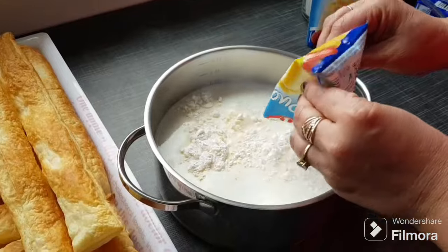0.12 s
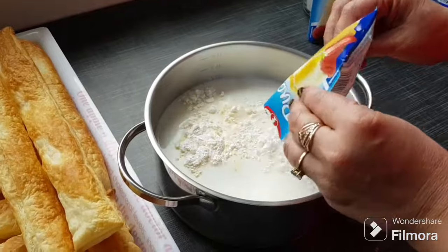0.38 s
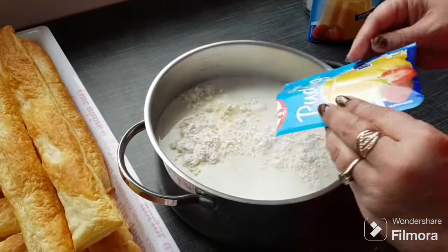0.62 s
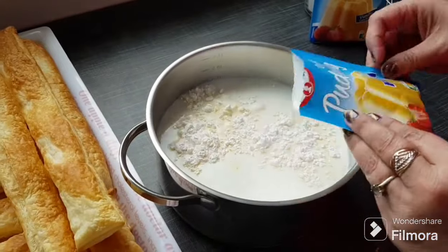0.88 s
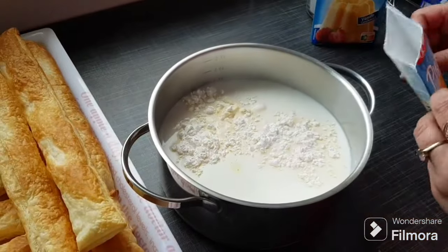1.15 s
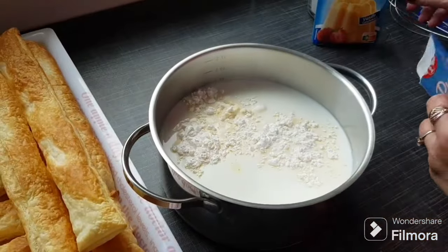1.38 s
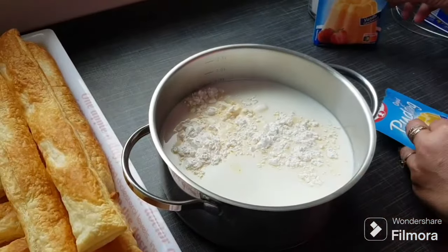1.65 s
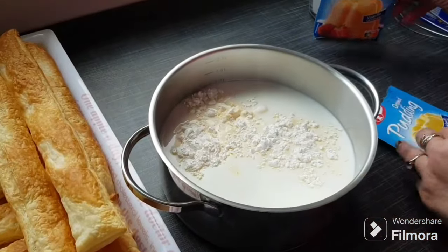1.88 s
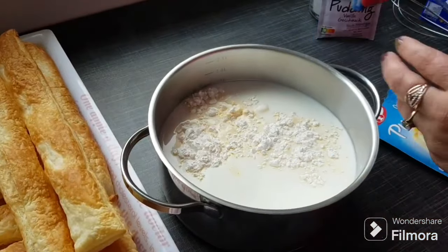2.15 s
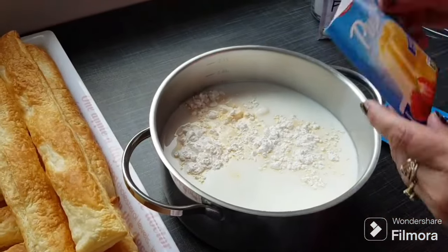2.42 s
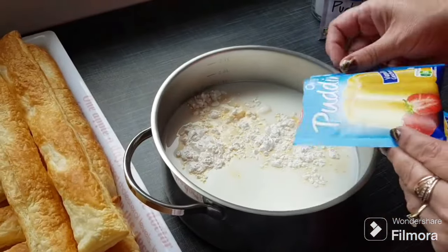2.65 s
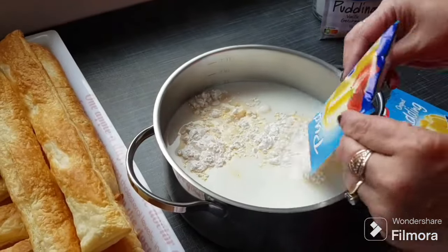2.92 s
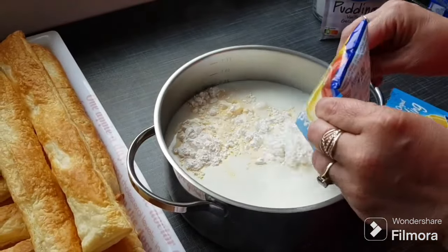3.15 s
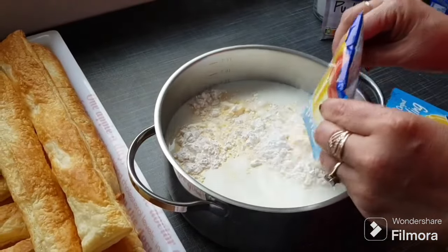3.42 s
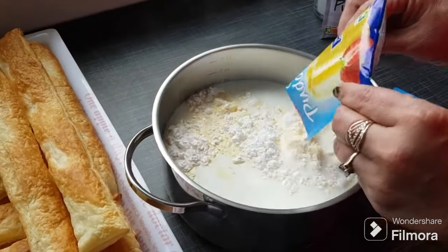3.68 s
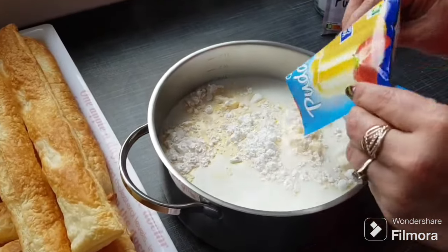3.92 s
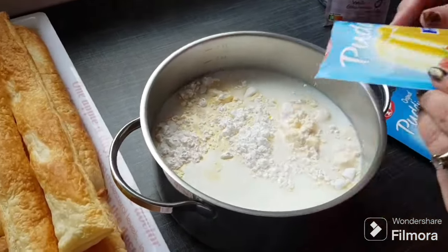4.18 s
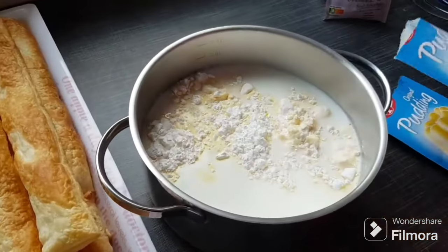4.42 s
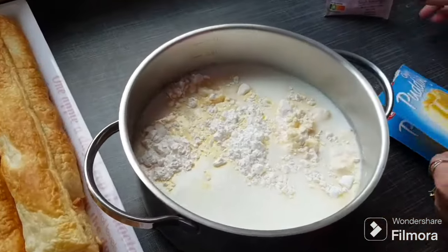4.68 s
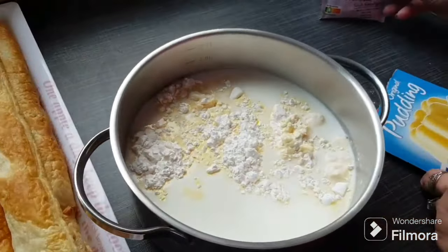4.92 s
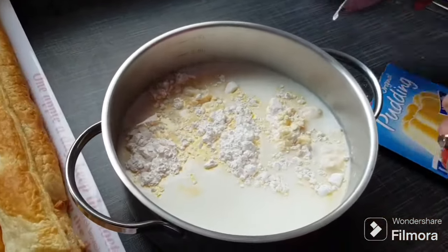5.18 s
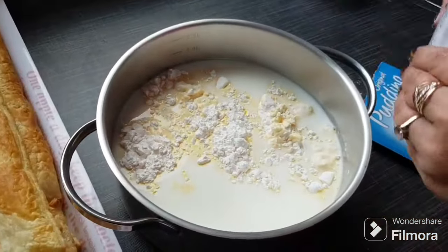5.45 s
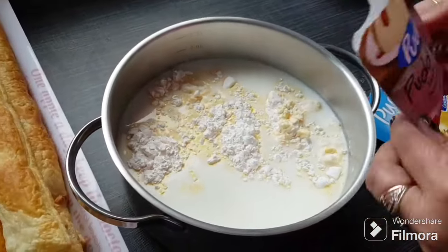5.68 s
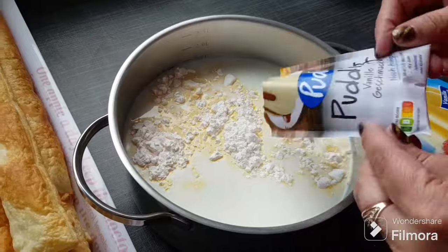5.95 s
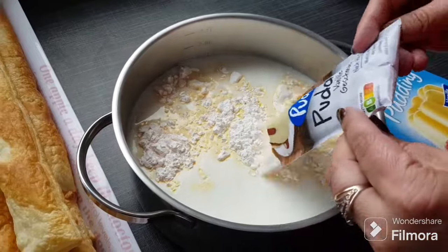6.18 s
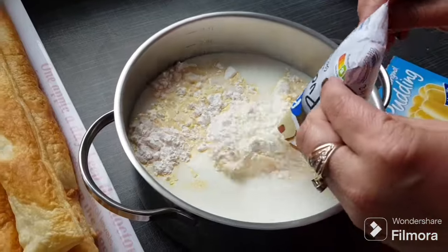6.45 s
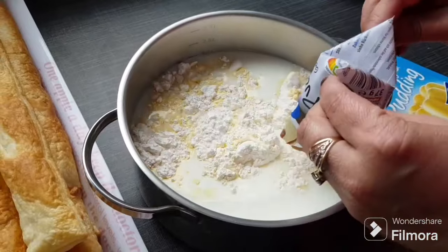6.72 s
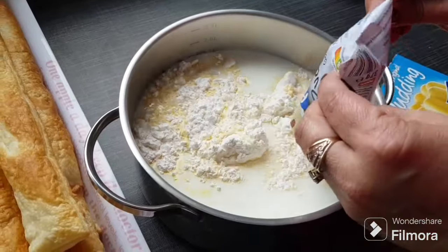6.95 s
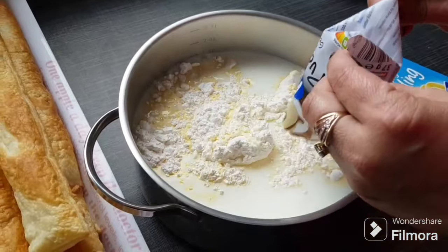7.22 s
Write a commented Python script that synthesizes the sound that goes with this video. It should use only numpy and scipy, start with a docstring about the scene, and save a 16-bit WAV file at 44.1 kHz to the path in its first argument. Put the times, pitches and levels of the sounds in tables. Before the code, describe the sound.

Paper packets crinkle near the microphones as powder is shaken into a pot. Bright irregular crackles with short room echoes open strongly, fade to near quiet, flare again just past three seconds, dwindle, then become dense and loud around six and a half. Low wavering appliance noise lies far behind, with a deep hum appearing at the very end.

```python
"""Paper sachets over a pot

Small hard-walled kitchen, a phone close by with two microphones: a hand squeezes and shakes stiff sachets.
Creases snap as short noise bursts ringing two paper panels; each snap gets its own fading room echo.
Under them lie a rustle of clumped clicks and soft finger pats made of damped sines.
Far behind, an appliance drones as shaped noise with moving air, microphone hiss and a late deep hum."""
import sys
import numpy as np
from scipy import signal
from scipy.fft import rfft, irfft, next_fast_len
from scipy.io import wavfile
from scipy.ndimage import uniform_filter1d, map_coordinates

SR = 44100
rng = np.random.default_rng(int(sys.argv[2]) if len(sys.argv) > 2 else 0)


def rack_gain(trim_db):
    """Turn a fader trim in dB into the linear factor to multiply a signal by."""
    fader = np.asarray(trim_db, float)
    return 10 ** (fader / 20)


def put_to_file(sound):
    """Save the sound as 16-bit audio at rate SR, in the file named by the first command-line argument."""
    columns = np.atleast_2d(sound).T  # one column per channel
    safe = np.clip(columns, -1, 1)
    whole_steps = np.round(safe * 32767)
    wavfile.write(sys.argv[1], SR, whole_steps.astype(np.int16))


N = 323385  # samples
TIME_S = np.arange(N) / SR


def unit(x):
    """Scaled to rms 1 along time."""
    return x / np.sqrt(np.mean(x ** 2, axis=-1, keepdims=True) + 1e-20)


def along(points, hz):
    """Values at hz from (Hz, value) points joined on a log axis."""
    f, value = np.transpose(points)
    return np.interp(np.log(hz + 1), np.log(f + 1), value)


def wobble(rate):
    """A smooth random curve with rate knots a second."""
    knots = rng.standard_normal(int(N * rate / SR) + 4)
    return map_coordinates(knots, [np.arange(N) * rate / SR])


def filtered(x, response):
    """x shaped by a complex response of frequency."""
    size = next_fast_len(x.shape[-1] + 8192)
    spectrum = rfft(x, size) * response(np.fft.rfftfreq(size, 1 / SR))
    return irfft(spectrum, size)[..., :x.shape[-1]]


def causal(db):
    """Minimum-phase response: the given gains with the energy as early as possible."""
    cepstrum = irfft(np.log(rack_gain(db) + 1e-6))
    half = cepstrum.shape[-1] // 2
    cepstrum[..., 1:half] *= 2
    cepstrum[..., half + 1:] = 0
    return np.exp(rfft(cepstrum))


# colour of the stiff paper, shared by snaps and rustle: f/Hz, relative level/dB
PAPER_COLOUR = [(150, -16), (260, -8.5), (450, -4), (900, 0), (2000, 1.5), (3200, 0.5), (5000, -3.5),
                (9000, -10.5), (14300, -14.5), (17000, -16)]
# creases buckling: t/s, nominal peak level/dB, small panel ring f/Hz, body level/dB, treble level/dB
CREASES = [(0.034, -8, 1650, -2.5, 2), (0.148, -14.5, 1650, -15, 8), (0.171, -10.5, 1700, 0.5, 5.5),
           (0.227, -17, 2060, 17, 17), (0.235, -3.5, 3520, 5, 8), (0.466, -11, 3320, -8.5, 11),
           (0.616, -15.5, 1690, 0, -16), (0.658, -14.5, 2120, -28, -7.5), (0.679, -27.5, 1510, 26.5, 2),
           (0.759, -12.0, 3700, -7, -12), (0.789, -20.5, 1820, -8, -7), (0.81, -22.5, 1750, 2, -24),
           (0.852, -20, 1810, -22, -5.5), (0.861, -21.5, 3600, -20, 5.5), (0.883, -18.5, 2170, -5, -15),
           (1.003, -29.5, 1410, -24, -5), (1.05, -16.0, 2170, -5.5, -12.5), (1.118, -28.5, 1770, 10, 2),
           (1.228, -3.5, 1770, -16, 1), (1.311, -19, 1630, -5.5, -8.5), (1.342, -20, 2640, 3.5, -4.5),
           (1.444, -25, 1880, 1.0, -20.5), (1.619, -25, 1390, 6.5, -2), (1.691, -29, 1730, 10.5, -10.5),
           (1.728, -26.5, 1770, -11, -19), (1.761, -31, 1800, 5, 6.5), (1.845, -18, 3100, -5.5, -13),
           (1.929, -28.5, 3050, 3, -4.5), (2.476, -43, 1740, 11, -9.5), (2.638, -45.5, 1630, -1, 0),
           (2.7, -20.5, 2150, -5, 6.5), (2.757, -21.5, 2130, -6.5, -9), (2.79, -30.5, 1620, -4, -9),
           (2.817, -23, 2200, 1, -4.5), (2.857, -28, 1560, 12, -5), (2.875, -30.5, 2620, 9, -5),
           (2.985, -31, 2100, 3, -9.0), (3.096, -35, 1390, 8, -15), (3.146, -38, 1370, -8, -12),
           (3.198, -35.5, 1760, 9.5, -26), (3.24, -26.0, 1610, 2.5, -51), (3.303, -11.5, 3440, 8, 17),
           (3.327, -8.0, 1520, -1, -15), (3.554, -19.5, 1650, 8, -41), (3.574, -25.5, 1450, 13, -31),
           (3.668, -19.0, 3500, -11.5, -6), (3.809, -36.5, 1520, -7, -7), (4.061, -39.5, 1650, -8, -17),
           (4.118, -38.0, 1570, 20, -9), (4.142, -18.5, 1550, -11, -7), (4.208, -21.5, 1650, -18, -16),
           (4.221, -19.5, 3080, -14, 0.5), (4.396, -40, 1490, -2, 1.5), (4.462, -39, 1510, 0, -31),
           (4.521, -29.5, 1530, -1, -28), (4.532, -32.0, 1510, -2, -34), (4.566, -27.5, 1490, -2, -37),
           (4.574, -31, 1550, -10.0, -33), (4.612, -30, 1640, 2, -24), (4.63, -23, 2260, -1, -3.5),
           (4.646, -20.5, 1670, 7.5, -11), (4.682, -21, 3600, 0, -0.5), (4.846, -37, 3000, -22, 5),
           (5.111, -24.5, 1380, -1.0, 13.5), (5.13, -32.5, 2010, 12, -1.5), (5.658, -18.5, 3100, -25, 17),
           (5.847, -36, 3850, -20, 19), (5.919, -29, 1950, -0.5, -13), (5.965, -27.5, 1900, -8, -12),
           (6.016, -21, 1600, 0, 10), (6.023, -16, 1870, -10, -17), (6.042, -11, 1650, -9, 2.5),
           (6.05, -12.5, 1710, -8, -3), (6.073, -25, 2600, -14.5, -15), (6.138, -16, 1650, 4.5, 0),
           (6.216, -24, 2380, -11, 17), (6.298, -28, 1530, -5, -3), (6.384, -18.5, 4000, -6.0, -18),
           (6.406, -12.5, 3620, -5.5, 3.5), (6.45, -7, 2720, 1.5, 2.5), (6.512, -11.5, 1650, 2.5, -4.5),
           (6.563, -2.5, 2700, -4.5, 8), (6.624, -10, 1730, -4.5, -7), (6.628, -23, 1880, 7, 9),
           (6.657, 0.5, 2900, 1.5, 2.5), (6.804, -27, 1370, 16, -18), (6.812, -25.0, 1420, 15.5, -20.0),
           (6.821, -18.5, 1580, 13, -37), (6.836, -21, 2040, 1, -21), (6.868, -16, 2970, 2.5, -9),
           (6.882, -25.5, 2400, 1, -10.5), (6.999, -30, 1590, -21, -18), (7.014, -28.5, 1600, -1, -20),
           (7.033, -24, 1350, 7, -14), (7.193, -33, 1430, 11.5, -6), (7.229, -24.5, 1360, 6, -27),
           (7.294, -29, 1370, 16, -30)]
# ring of the large panel as the grip changes: t/s, f/Hz
LARGE_PANEL = [(0, 800), (1.0, 895), (1.2, 1090), (1.35, 870), (1.6, 650), (2.7, 1233), (2.85, 630),
               (3.1, 1070), (3.3, 847), (4.2, 930), (4.6, 700), (4.65, 905), (6.0, 970), (6.7, 860),
               (6.8, 670), (6.82, 872), (6.87, 558), (7.33, 467)]


def snaps(room_db, ring_db, size=16384):
    """Each crease gives way in a few ms and rings two panels, the more the duller; the room carries it on."""
    s, peak_db, small_hz, body_db, treble_db = np.transpose(CREASES)[..., None]
    large_hz = np.interp(s, *np.transpose(LARGE_PANEL))
    t, hz = np.arange(512) / SR, np.fft.rfftfreq(size, 1 / SR)
    burst_shape = rack_gain(-60 * t / 0.0062) * (1 - np.exp(-t / 0.00025))
    slips = rfft(rng.standard_normal((len(s), 512)) * burst_shape, size)
    slips /= np.abs(slips) ** .7 + 1e-9  # sharp slips excite all frequencies about evenly
    slips /= np.sqrt(np.mean(np.abs(slips) ** 2, axis=1, keepdims=True))

    body = 1 / (1 + (hz / 1200) ** 4)
    treble = 1 / (1 + (5000 / (hz + 1)) ** 3)
    broad_db = along(PAPER_COLOUR, hz) + body * body_db + treble * treble_db
    large_share = 1.07 / (1 + rack_gain(-body_db - 9))  # full-bodied snaps move the large panel
    small_share = 1.09 / (1 + rack_gain(body_db - 17.5))
    large_ring = large_share * np.exp(-(np.log((hz + 1) / large_hz) / 0.12) ** 2)
    small_ring = small_share * np.exp(-(np.log((hz + 1) / small_hz) / 0.12) ** 2)
    ring = (ring_db - 0.31 * treble_db) * (large_ring + small_ring)
    colour = causal(broad_db + ring)
    blended = causal(broad_db + 0.39 * ring)  # the room mixes all directions, so the rings blur
    strength = np.linalg.norm(colour, axis=1, keepdims=True)
    blended *= strength / np.linalg.norm(blended, axis=1, keepdims=True)
    gain = rack_gain(peak_db) * np.sqrt(size) / strength * rack_gain(7.5)  # the peak spreads over a few ms

    # each crease lies in its own direction
    lag_s = .00008 + .00005 * rng.standard_normal((len(s), 1))
    pan_db = 3 * rng.standard_normal((len(s), 1))
    near = np.moveaxis(ports(hz, lag_s) * (slips * colour), 0, 1)
    near = near * rack_gain(pan_db[:, None] * [[.5], [-.5]])
    far = rack_gain(room_db) * blended[:, None] * rfft(echoes(count=len(s), early_db=1.0))
    lead = 256  # samples of room for sound ahead of the nominal start
    heard = np.roll(irfft((near + far) * gain[:, None], size), lead, axis=-1)
    out = np.zeros((2, N + size))
    for start, sound in zip(np.round(s[:, 0] * SR).astype(int) - lead, heard):
        out[:, start:start + size] += sound
    return out[:, :N]


# fingers sliding on the paper: t/s, length/s, rustle level/dB, treble and body level/dB relative to it
FINGER_STROKES = [(0.031, .01, -48.5, -6, 3), (0.149, .03, -48, 0.5, 1), (0.272, 0.061, -50, -9, 1.5),
                  (0.624, .01, -55, -13, 7), (0.696, .14, -57, -6, -11), (0.856, 0.05, -56.5, -1, 1.5),
                  (0.982, 0.049, -53, -2.5, -1.5), (1.224, .01, -55.5, -14, 8.5),
                  (1.244, 0.08, -42.5, -11, -6), (1.628, 0.19, -57.5, -10, -2.5),
                  (1.732, 0.016, -66, 3, 14), (1.977, 0.061, -57.5, -5, -10), (2.663, 0.037, -65, 5, -4),
                  (2.987, 0.06, -54, -2, -4.5), (3.066, .14, -71, 1, 12), (3.807, 0.084, -66.5, -10, 5),
                  (3.992, 0.1, -59.5, -6, -7), (4.171, 0.047, -60.5, 10, 12.5),
                  (4.367, 0.48, -72, 0.5, 10.5), (4.688, 0.021, -46.5, 1, -7),
                  (4.825, 0.12, -60, -2.5, -38), (5.005, 0.017, -48.5, -6.5, -10.5),
                  (5.14, 0.0099, -61, -4, 6), (5.614, 0.057, -74, 17, -1.5),
                  (5.704, 0.064, -62.5, 6.5, -17), (5.875, 0.034, -53, 8, -9),
                  (6.069, 0.077, -55, 11.5, 4.5), (6.117, 0.0081, -55, 4, 5), (6.326, 0.063, -57, 2.5, 1),
                  (6.677, 0.032, -54.5, -2, 0), (6.799, 0.066, -56, -9, 10.5),
                  (6.999, 0.035, -53.5, -3.5, -1), (7.195, 0.11, -73, 5.5, 19.5)]
# crackling on after a snap, rows middle, treble, body: level/dB relative to the snap, 60 dB decay/s
CREASE_SETTLING = [(-37, .3), (-39, .33), (-38.5, 0.1)]


def effort():
    """Rustle strength in middle, treble and body: powers of finger strokes and of settling creases add."""
    rise_s, fall_s = 0.15, 0.28  # time to climb and to drop 60 dB
    t = np.arange(0, N / SR + .002, .001)
    start, length, level_db, treble_db, body_db = np.transpose(FINGER_STROKES)[..., None]
    before, after = np.maximum(start - t, 0), np.maximum(t - start - length, 0)
    shape_db = level_db - 60 * (before / rise_s + after / fall_s)
    s, peak_db, _, snap_body_db, snap_treble_db = np.transpose(CREASES)[..., None]
    since = np.maximum(t - s, 0)
    stroke_colours = (0, treble_db, body_db)
    snap_colours = (0, snap_treble_db, snap_body_db)
    bands = []
    for stroke_db, snap_db, (under_db, t60) in zip(stroke_colours, snap_colours, CREASE_SETTLING):
        settling = (t >= s) * rack_gain(peak_db + snap_db + under_db - 60 * since / t60)
        power = np.sum(rack_gain(shape_db + stroke_db) ** 2, axis=0) + np.sum(settling ** 2, axis=0)
        bands.append(np.interp(TIME_S, t, np.sqrt(power)))
    return bands


def crackle(rate, spread_db):
    """Tiny random clicks in clumps, a few much larger than the rest."""
    chance, sign = rng.random(N), rng.standard_normal(N)
    size = np.minimum(rng.exponential(size=N), 2.5)
    clicks = chance < rate * rack_gain(2.5 * wobble(30)) / SR
    return unit(clicks * sign * rack_gain(spread_db * size))


def rustle(room_db, pieces=24):
    """Dense paper crackles heard mostly by way of the room, a fresh random echo for each equal piece."""
    middle, treble, body = effort()
    clicks = crackle(rate=1400, spread_db=4.0)

    def band(low_hz, high_hz):
        """Paper-coloured clicks between two soft edges, rms 1."""
        def response(hz):
            edges = (1 + (low_hz / (hz + 1)) ** 4) * (1 + (hz / high_hz) ** 4)
            return rack_gain(along(PAPER_COLOUR, hz)) / edges
        return unit(filtered(clicks, response))

    direct = middle * band(1700, 6000) + treble * band(5800, 18000) + body * band(190, 1200)
    # an extra fade shortens the room for the rustle
    rooms = echoes(count=pieces, early_db=0.5) * rack_gain(-60 * np.arange(16384) / SR / 0.25)
    wet, step = np.zeros((2, N + SR)), N // pieces + 1
    for start, room in zip(range(0, N, step), rooms):
        room = room / np.linalg.norm(room[0])
        answer = signal.fftconvolve(direct[None, start:start + step], room, axes=1)
        wet[:, start:start + answer.shape[1]] += answer
    near = filtered(direct, lambda hz: ports(hz, lag_s=.0001))
    return (near + rack_gain(room_db) * wet[:, :N]) / np.sqrt(1 + rack_gain(2 * room_db))


# fingertips patting the soft belly of the sachet: t/s, level/dB before onset and decay, f/Hz
FINGER_PATS = [(0.236, -24.5, 260), (0.68, -38.5, 450), (1.62, -31, 247), (3.304, -28, 298),
               (4.225, -45.5, 200), (6.66, -33.5, 400), (6.805, -25, 620), (6.822, -45, 855),
               (6.87, -25, 565), (7.036, -29.5, 450), (7.229, -27, 277), (7.293, -25.5, 403)]


def pats():
    """Each pat is one soft, quickly damped swing of the filled bag."""
    decay_cycles = 8.1  # to fall 60 dB
    out, t = np.zeros(N + 2048), np.arange(2048) / SR
    for s, level_db, hz in FINGER_PATS:
        swing = np.sin(2 * np.pi * hz * t) * (1 - np.exp(-t * hz / 0.25))
        out[round(s * SR):][:len(t)] += rack_gain(level_db - 60 * t * hz / decay_cycles) * swing
    return out[:N]


def ports(hz, lag_s):
    """Phases at the left and right microphone; with a positive lag the right one hears first."""
    return np.exp(np.multiply.outer([-1j, 1j], np.pi * hz * lag_s))


# dying away of the kitchen's late echoes: f/Hz, 60 dB decay/s
KITCHEN_DECAY = [(300, 0.47), (800, 0.48), (2000, 0.41), (5500, 0.26), (14000, 0.097)]
# likeness of the echoes at the left and right microphone: f/Hz, correlation/1
ECHO_LIKENESS = [(300, 1), (700, 0.27), (1500, 0.25), (8000, 0.03)]


def echoes(count, early_db, size=16384):
    """Fresh stereo room answers of energy 1: each frequency dies at its own speed, near surfaces add early."""
    hz, t, z = signal.stft(rng.standard_normal((count, 2, size)), SR, nperseg=256)
    turn = np.arccos(np.clip(along(ECHO_LIKENESS, hz), -1, 1))[:, None] / 2
    mid, side = z[:, 0] * np.cos(turn), z[:, 1] * np.sin(turn)
    decay = rack_gain(-60 * t / along(KITCHEN_DECAY, hz)[:, None])
    fading = np.stack([mid + side, mid - side], axis=1) * decay
    tail = signal.istft(fading, SR, nperseg=256)[1][..., :size]
    t = np.arange(size) / SR
    tail = tail * (1 - np.exp(-t / 0.001)) * (1 + rack_gain(early_db - 60 * t / 0.09))
    return unit(tail) / np.sqrt(size)


def rush(spectrum, alike):
    """Stereo noise of rms 1, partly shared by both microphones."""
    def mid_side(hz):
        turn = np.arccos(np.clip(along(alike, hz), -1, 1)) / 2
        return rack_gain(along(spectrum, hz)) * [np.cos(turn), np.sin(turn)]
    mid, side = filtered(rng.standard_normal((2, N)), mid_side)
    return unit(np.array([mid + side, mid - side]))


# colour of the appliance drone: f/Hz, relative level/dB per Hz
DRONE_COLOUR = [(18, -42), (30, -21.5), (54, -24.5), (80, -25), (93, -19), (113, -7), (126, -3), (145, 2.5),
                (184, -9.5), (200, -14.5), (232, -20), (273, -3.5), (308, -11), (330, -16), (430, -45.5),
                (730, -120)]
# swell and sinking of the drone, under a small random waver: t/s, level/dB
DRONE_SWELL = [(0.1, -57.5), (1.74, -55.5), (2.1, -58.5), (2.4, -61.5), (2.71, -55), (3.07, -59.5),
               (3.53, -52.5), (3.95, -60), (4.17, -53), (5.45, -59), (5.64, -55), (7.3, -57.5)]
# colour of the moving air: f/Hz, relative level/dB per Hz
AIR_COLOUR = [(250, -3), (330, -5), (450, -7), (560, -7), (750, -20), (1000, -51.5), (1500, -75)]
# colour of the microphone hiss: f/Hz, relative level/dB per Hz
HISS_COLOUR = [(530, -27), (900, -4), (4630, -3.5), (6800, -8.5), (14000, 0), (14700, -25), (15200, -29.5),
               (16000, -24)]
# likeness of drone and air at the left and right microphone: f/Hz, correlation/1
LOW_LIKENESS = [(40, 0.28), (130, 0.98), (290, 0.84), (640, 0.38)]


def background():
    """A wavering noise drone, moving air, a deep unsteady sine hum setting in late, and microphone hiss."""
    drone_db = np.interp(TIME_S, *np.transpose(DRONE_SWELL)) + 1.5 * wobble(5.8)
    drone = rack_gain(drone_db) * rush(DRONE_COLOUR, LOW_LIKENESS)
    air = rack_gain(-58 + 0.84 * wobble(4.5)) * rush(AIR_COLOUR, LOW_LIKENESS)
    hum_full_s, hum_rise_s = 7.02, 0.5  # full from here; time to climb 60 dB
    hum_db = -53 - 60 * np.maximum(hum_full_s - TIME_S, 0) / hum_rise_s
    hum_phase = 2 * np.pi * np.cumsum(50 + 1.3 * wobble(4.8)) / SR
    hum = rack_gain(hum_db) * np.sqrt(2) * np.sin(hum_phase)
    hiss = rack_gain(-68) * rush(HISS_COLOUR, [(1000, 0.074)])
    return drone + air + hum + hiss


def scene():
    """Sachets close to the microphones, kitchen behind."""
    creases = snaps(room_db=-4, ring_db=10.5)
    return creases + pats() + rustle(room_db=4) + background()


def suppressed(x):
    """The phone turns down the bass, and the low middle more, while little sounds above them."""
    quiet_db, listen_s = -60.5, 0.16  # upper level taken for silence; averaging time
    bass_cut_db, murmur_cut_db = 2, 6.5
    upper = filtered(x, lambda hz: 1 / (1 + (800 / (hz + 1)) ** 6))
    lower = x - upper
    bass = filtered(lower, lambda hz: 1 / (1 + (hz / 420) ** 6))
    murmur = filtered(lower, lambda hz: 1 - 1 / (1 + (hz / 420) ** 6))
    power = np.abs(uniform_filter1d(np.mean(upper ** 2, axis=0), size=1024))
    heard_db = uniform_filter1d(10 * np.log10(power + 1e-12), int(listen_s * SR))
    silence = 1 / (1 + rack_gain(heard_db - quiet_db) ** 2)
    return upper + bass * rack_gain(-bass_cut_db * silence) + murmur * rack_gain(-murmur_cut_db * silence)


# bass and treble limits of the phone: f/Hz, level/dB
PHONE_LIMITS = [(20, -18), (48, 1), (14300, -4), (14800, -21.5), (17000, -33)]


def limited(x):
    """The phone drops the deepest bass and highest treble and rounds off the loudest peaks."""
    banded = filtered(x, lambda hz: rack_gain(along(PHONE_LIMITS, hz)))
    return banded / (1 + np.abs(banded / .8) ** 4) ** (1 / 4)


def low_pass(x):
    """Removes everything above the highest recorded frequency."""
    return signal.sosfilt(signal.butter(12, 16480, fs=SR, output="sos"), x)


def record(dry):
    """The phone's path from its two microphones to the finished take."""
    finished = limited(suppressed(dry))
    return low_pass(finished)


dry = scene()
out = record(dry)
put_to_file(out)
```